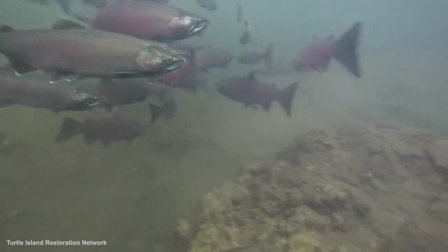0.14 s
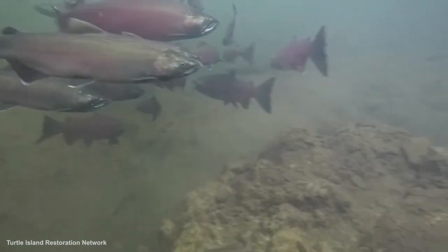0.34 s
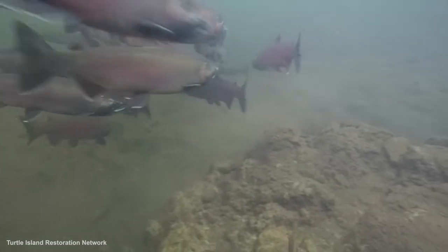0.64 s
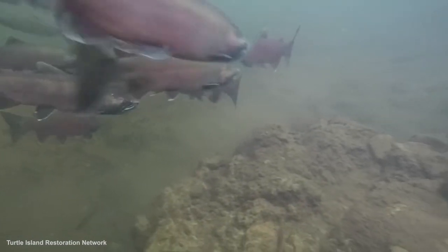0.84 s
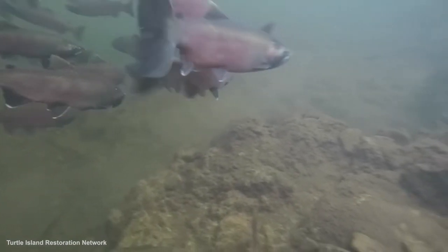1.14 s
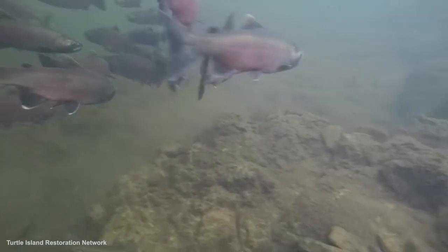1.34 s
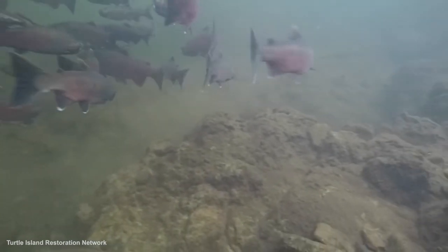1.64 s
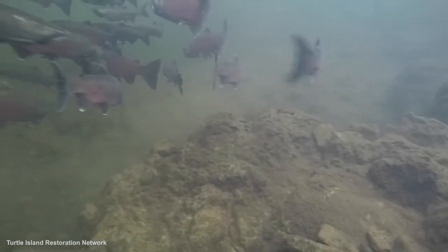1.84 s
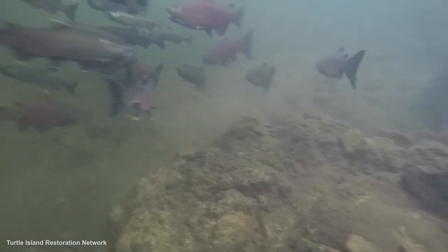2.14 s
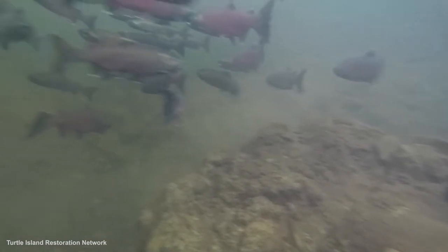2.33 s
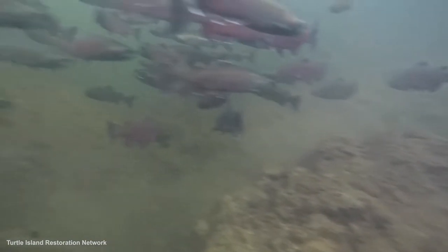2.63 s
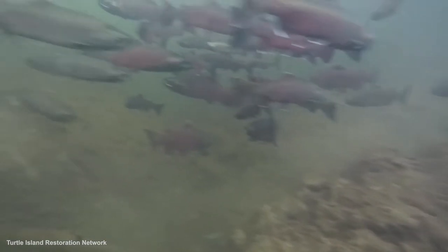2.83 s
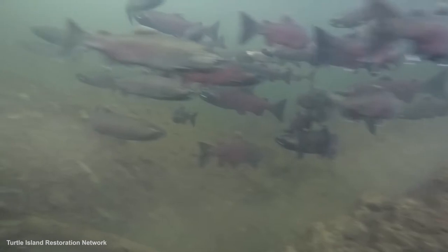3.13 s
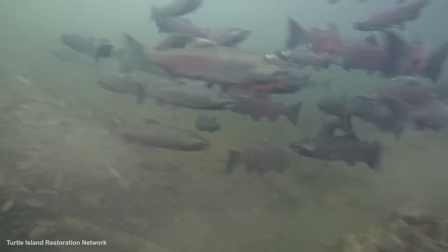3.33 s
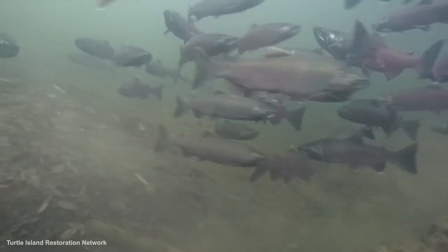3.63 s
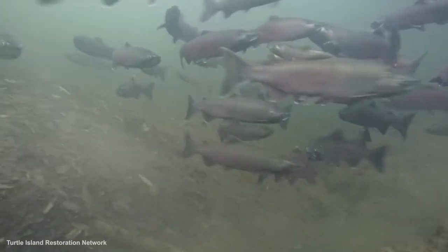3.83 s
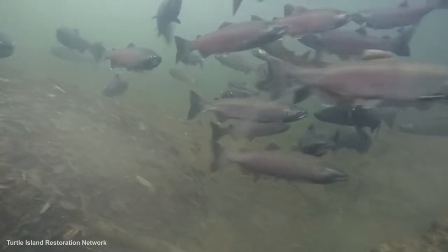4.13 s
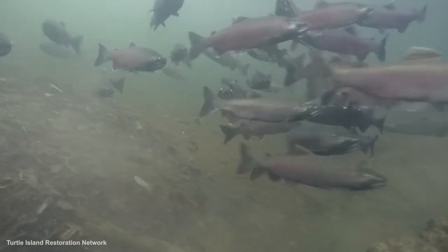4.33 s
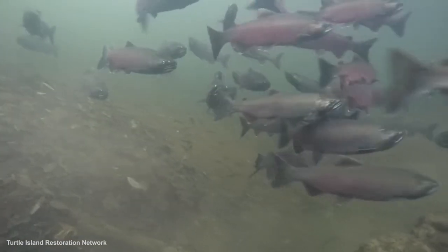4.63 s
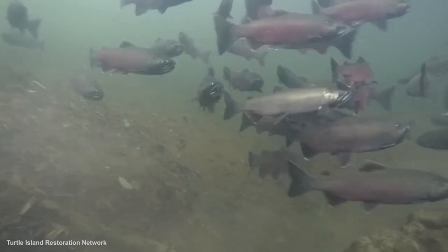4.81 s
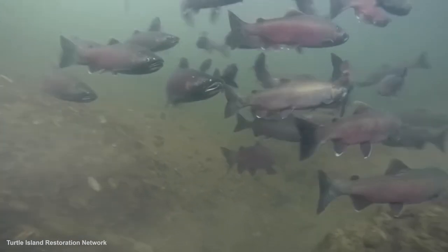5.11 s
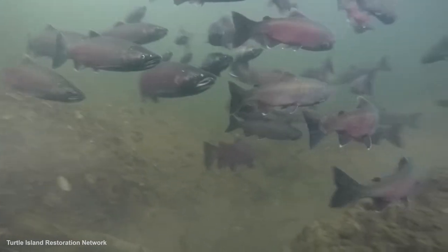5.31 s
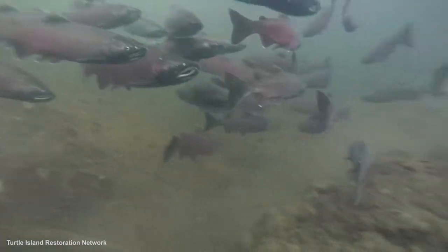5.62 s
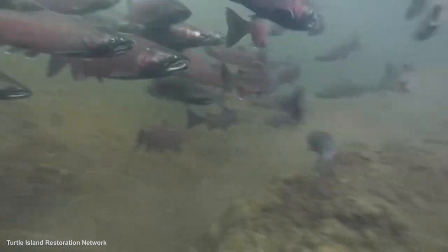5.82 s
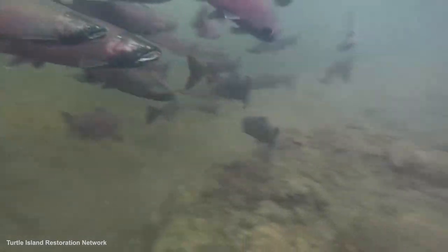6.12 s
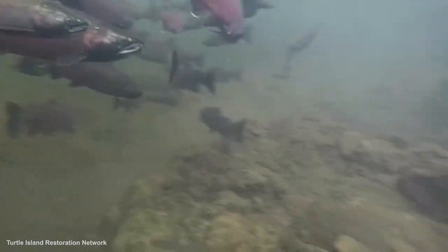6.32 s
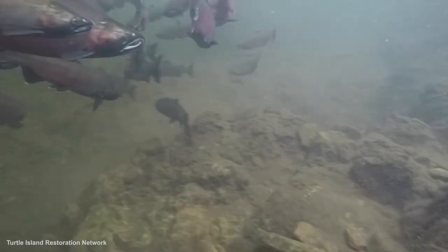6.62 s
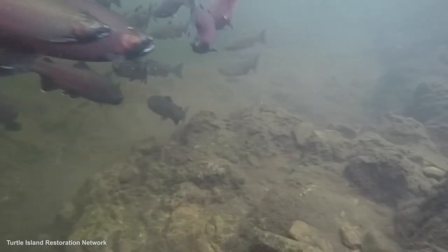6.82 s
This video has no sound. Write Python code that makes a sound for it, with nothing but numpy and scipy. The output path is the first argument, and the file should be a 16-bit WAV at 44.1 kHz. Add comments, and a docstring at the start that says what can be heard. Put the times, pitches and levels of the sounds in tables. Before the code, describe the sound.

Deep muffled thuds of shifting current subside into a quiet underwater riffle, dotted with bubble blips, thin silt hiss and small clicks.

```python
"""First come low, heavy surges and shoves of current against a sealed housing, under water in a salmon creek.
Behind them lies the distant riffle, a soft wash of countless small bubbles, with a thin hiss of silt.
Close to the microphone single bubbles gurgle, grit ticks on the case and knots of small bubbles trickle past.
Eddies, wash and hiss are shaped noise; bubbles are gliding, decaying sines; grains are short rings with noise."""
import sys
import numpy as np
from scipy import signal
from scipy.fft import rfft, irfft, next_fast_len
from scipy.io import wavfile
from scipy.ndimage import uniform_filter1d

SR = 44100
rng = np.random.default_rng(int(sys.argv[2]) if len(sys.argv) > 2 else 0)


def wav_record(signal):
    """Record a signal, one row per channel, as 16-bit PCM in the file named by sys.argv[1]."""
    frames = np.transpose(np.atleast_2d(signal))
    bounded = np.clip(frames, -1, 1)
    # unit amplitude maps onto the largest positive 16-bit level
    quanta = np.round(bounded * 32767).astype(np.int16)
    wavfile.write(sys.argv[1], SR, quanta)


N = 306936  # samples


def amp(db):
    """Decibels to gain."""
    return 10 ** (np.asarray(db) / 20)


def unit(x):
    """Scale to rms 1."""
    return x / np.sqrt(np.mean(x ** 2) + 1e-20)


def filtered(x, response):
    """Multiply the spectrum of x by a response of frequency, without phase shift."""
    padded = next_fast_len(len(x) + SR // 2)
    hz = np.fft.rfftfreq(padded, 1 / SR)
    return irfft(rfft(x, padded) * response(hz), padded)[:len(x)]


def lowpass(x, corner_hz, order):
    """Keep mainly what lies below the corner."""
    return filtered(x, lambda hz: 1 / (1 + (hz / corner_hz) ** order))


def coloured(x, spectrum):
    """Shape x with a (f/Hz, level/dB) spectrum, then scale to rms 1."""
    f, db = np.transpose(spectrum)
    return unit(filtered(x, lambda hz: amp(np.interp(np.log(hz + 1), np.log(f + 1), db))))


def t60_decay(t, t60):
    """Exponential decay that has fallen 60 dB after t60 seconds."""
    return np.exp(-np.log(1000) * t / t60)


def add(track, s, sound):
    """Mix a sound into the track at time s."""
    part = track[max(0, round(s * SR)):][:len(sound)]
    part += sound[:len(part)]


SKIRT = 11  # far from its crest a swell dies away as this power of time


def swells(rows):
    """Gain of (t/s, level/dB, width/s) swells, round at the crest, summed as powers."""
    t = np.arange(N) / SR
    power = np.zeros(N)
    for s, db, width in rows:
        swell = amp(db) * (1 + ((t - s) / width) ** 2 / SKIRT) ** (-SKIRT / 2)
        power += swell ** 2
    return np.sqrt(power)


def eddies(spectrum, span):
    """Low turbulent pressure whose strength is evened out over span seconds."""
    x = coloured(rng.standard_normal(N), spectrum)
    power = uniform_filter1d(np.abs(signal.hilbert(x)) ** 2, max(1, int(span * SR)))
    return unit(x / np.sqrt(np.abs(power) + 1e-3))


REBOUND = 0.4  # how far the swing after a shove outgrows the one before it


def shove(u):
    """Pressure of one eddy passing, u widths from its centre: a peak, then the water swings back."""
    return (1 - u ** 2 - REBOUND * u) * np.exp(-u ** 2 / 2)


# Relative spectra of the slow sway and the faster buffeting at the housing: f/Hz, level/dB
SWAY_SPECTRUM = [(2, 5.5), (6, 1), (12, 4.5), (19, -2), (28, -52.5), (45, -56), (90, -93), (200, -120)]
BUFFET_SPECTRUM = [(14, -8), (23, 12), (34, -8), (52, -13.5), (70, -20.5), (100, -31.5), (150, -48),
                   (400, -100)]
# Surges of current past the housing: crest t/s, buffeting level/dB before small eddies grow, width/s
CURRENT_SURGES = [(0.118, -44, 0.061), (0.3, -41, 0.11), (0.505, -32.5, 0.039), (0.74, -51.5, 0.14),
                  (0.96, -45.5, 0.11), (1.361, -50, 0.27), (1.75, -49.5, 0.12), (2.01, -47.5, 0.14),
                  (2.5, -54, 0.13), (2.889, -51.5, 0.11), (3.403, -55.5, 0.073), (4.0, -57.5, 0.086),
                  (4.37, -46.5, 0.12), (4.57, -47, 0.11), (5.101, -52, 0.15), (5.42, -56, 0.04),
                  (5.78, -55.5, 0.15), (6.22, -59, 0.13), (6.82, -54.5, 0.12)]
# Sudden shoves of water: t/s, level/dB before the last column, width/s, signed factor (push +, suction -)
WATER_SHOVES = [(0.008, -19, 0.022, -1.17), (0.043, -29.5, 0.009, -1.4), (0.126, -25, 0.015, 1),
                (0.182, -31.5, 0.0084, -1.24), (0.284, -26.5, 0.0093, 1), (0.403, -22.5, 0.016, -1.2),
                (0.505, -17, 0.011, -1.15), (0.581, -31, 0.01, -0.84), (0.639, -21, 0.008, -0.65),
                (0.841, -37.5, 0.0083, 0.91), (0.9, -29, 0.0089, 0.86), (0.957, -29.5, 0.0068, 0.79),
                (1.042, -23, 0.013, -1.1), (1.37, -30.5, 0.012, 0.79), (4.404, -28, 0.019, -0.88),
                (4.495, -30, 0.0093, 1), (4.545, -43, 0.006, -0.89), (4.571, -32, 0.0075, -1.1),
                (4.602, -28, 0.019, -0.93), (5.11, -30, 0.023, -1.07), (5.431, -34.5, 0.02, -1),
                (5.795, -28.5, 0.025, -1.06)]
CALM_DB, MIDDLING_DB = -81, -40.5  # buffeting between surges and in a middling one
SWAY_DB, SWAY_GROWS = -30, 0.75  # sway in a middling surge; its dB per dB of buffeting
SWAY_OUTLASTS = 1.29  # length of the sway over that of the buffeting
SMALL_EDDY_HZ, SMALL_EDDY_GROWS = 45.3, 0.39  # lower bound of small eddies; their extra dB per dB
SHOVE_EDGE = 0.23  # share of the hardest shove in its steep core; gentler ones are rounder
EDGE_WIDTH = 0.47  # width of that core over the whole shove


def current():
    """Surges sway and buffet the housing, brighter the stronger they are; single eddies shove it."""
    sway_rows = []
    for s, db, width in CURRENT_SURGES:
        sway_db = SWAY_DB + SWAY_GROWS * (db - MIDDLING_DB)
        sway_rows.append((s, sway_db, SWAY_OUTLASTS * width))
    sway = lowpass(swells(sway_rows) * eddies(SWAY_SPECTRUM, span=0.19), corner_hz=30.2, order=4)

    strength = np.hypot(swells(CURRENT_SURGES), amp(CALM_DB))
    churn = eddies(BUFFET_SPECTRUM, span=0.086)
    large = lowpass(churn, corner_hz=SMALL_EDDY_HZ, order=6)
    small = (churn - large) * (strength / amp(MIDDLING_DB)) ** SMALL_EDDY_GROWS
    pressure = strength * (large + small)

    hardest_db = max(row[1] for row in WATER_SHOVES)
    for s, db, width, direction in WATER_SHOVES:
        u = (np.arange(N) / SR - s) / width
        edge = SHOVE_EDGE * amp(db - hardest_db)
        shape = (1 - edge) * shove(u) + edge * shove(u / EDGE_WIDTH)
        pressure += direction * amp(db) * shape
    return lowpass(sway + pressure, corner_hz=122, order=8)


def patchy_noise(patchy_db):
    """White noise with short patches of random gain across time and pitch."""
    z = signal.stft(rng.standard_normal(N), nperseg=1024)[2]
    field = uniform_filter1d(rng.standard_normal(z.shape), size=6, axis=0)
    field = uniform_filter1d(field, size=7, axis=1)
    return unit(signal.istft(z * amp(patchy_db * unit(field)), nperseg=1024)[1][:N])


def bubble(t, hz, t60, rise, onset_cycles):
    """A bubble rings softly into life and its pitch glides by the share rise over t60; peak of swell 1."""
    phase = 2 * np.pi * hz * t * (1 + rise * t / t60 / 2)
    swell = t60_decay(t, t60) * (1 - np.exp(-t * hz / onset_cycles))
    return np.sin(phase) * swell / swell.max(axis=-1, keepdims=True)


def bubble_cloud(count, low_hz, high_hz, cycles, spread_db):
    """Small bubbles at random moments, rms 1; a positive spread lifts a few, a negative one sinks a few."""
    when, size, life, strength = rng.random((count, 4)).T[:, :, None]
    hz = low_hz * (high_hz / low_hz) ** size
    t = np.arange(SR // 16) / SR
    gain = amp(spread_db * np.minimum(-np.log(1 - strength), 4)) * hz / low_hz
    rings = gain * bubble(t, hz, cycles * (.5 + life) / hz, rise=0.13, onset_cycles=0.66)
    at = (when * N).astype(int) + np.arange(len(t))
    return unit(np.bincount(at.ravel(), rings.ravel(), N)[:N])


# Relative spectra of the distant wash and the hollow rush below it: f/Hz, level/dB
WASH_SPECTRUM = [(110, -12), (175, -4), (260, -3.5), (350, 1.5), (420, -3), (475, 0), (540, -3.5), (780, 3),
                 (1100, -1.5), (1350, 0.46), (1950, -1.5), (2450, -4.5), (3200, -7), (4500, -12),
                 (5800, -16.5), (7000, -16.5), (12000, -73)]
HOLLOW_SPECTRUM = [(30, 2), (70, -0.5), (110, -0.5), (160, -13.5), (260, -32), (600, -77)]
RIFFLE_DB, HOLLOW_DB = -65, -78  # steady levels


def riffle():
    """Far bubbles merge into a wash; nearer ones babble through it, over a faint hollow rush."""
    babble = bubble_cloud(count=450, low_hz=284.3, high_hz=1008, cycles=58, spread_db=1.5)
    prickle = bubble_cloud(count=2200, low_hz=1123, high_hz=5850, cycles=14.5, spread_db=3.0)
    mixture = patchy_noise(patchy_db=1.5) + amp(-24.0) * babble + amp(-12.0) * prickle
    wash = coloured(mixture, WASH_SPECTRUM)
    flutter_noise = coloured(rng.standard_normal(N), [(2, 8.0), (25, -24.0), (80, -27), (300, -100)])
    flutter = 1 + 0.045 * flutter_noise
    hollow = coloured(rng.standard_normal(N), HOLLOW_SPECTRUM)
    return amp(RIFFLE_DB) * flutter * wash + amp(HOLLOW_DB) * hollow


# Relative spectrum of the silt hiss: f/Hz, level/dB
SILT_SPECTRUM = [(3500, -3), (6000, -20.5), (7500, -1.5), (10800, -4), (13000, -12), (15500, -17.5)]
SILT_DB = -77.5  # steady level


def silt():
    """Fine sand and tiny bubbles sweep past as a thin hiss dotted with faint pings."""
    pings = bubble_cloud(count=700, low_hz=6160, high_hz=12700, cycles=14, spread_db=3.0)
    return amp(SILT_DB) * coloured(patchy_noise(patchy_db=2.0) + amp(-12.5) * pings, SILT_SPECTRUM)


# Single bubbles close to the microphone: t/s, ring level/dB, starting f/Hz,
# share of pitch gained (+) or lost (-) by the time it is 60 dB down, starting-pitch cycles until then
NEAR_BUBBLES = [(0.3028, -49.5, 3000, 0.0042, 31), (0.304, -62.5, 560, 0.12, 49),
                (0.388, -56, 3900, 0.36, 17), (0.396, -69, 716, 0.42, 45), (0.491, -65, 395, -0.43, 60),
                (0.578, -61.5, 730, 0.58, 61), (0.738, -63.5, 376, 0.22, 41), (0.872, -59, 1165, 0.32, 43),
                (1.078, -59, 840, 0.24, 63), (1.242, -61, 646, 0.46, 49), (1.407, -61.5, 680, 0.42, 52),
                (1.529, -56, 4050, -0.046, 25), (1.609, -57, 4450, 0.12, 30), (2.44, -62, 765, -0.013, 38),
                (2.678, -57.5, 437, -0.37, 35), (3.092, -59, 810, -0.07, 49), (3.112, -59, 707, -0.051, 55),
                (3.18, -57, 3170, 0.95, 42), (3.182, -53.5, 1600, 1.8, 40), (3.191, -61, 2750, 0.4, 40),
                (3.24, -61, 3150, 0.3, 35), (3.277, -58, 3260, -0.039, 35), (3.968, -64, 317, 0.41, 30),
                (4.362, -56, 2600, 0.039, 26), (4.49, -64.5, 486, 0.15, 45),
                (4.937, -53.5, 3030, -0.04, 26), (4.944, -49, 3830, -0.055, 26),
                (4.992, -54.5, 2100, 0.15, 30), (5.045, -63, 488, 0.08, 56), (5.133, -60, 302, 0.78, 31),
                (5.16, -58.5, 830, 0.021, 49), (5.161, -61, 364, 0.23, 36), (5.205, -63, 463, -0.0036, 27),
                (5.297, -62, 585, 0.13, 84), (5.738, -64, 400, -0.15, 48), (6.554, -58, 1870, 0.17, 43),
                (6.593, -61.5, 415, 0.6, 55), (6.591, -61, 926, 0.37, 40), (6.6225, -54, 525, 0.65, 34),
                (6.6268, -54.5, 2170, -0.19, 20), (6.626, -58.5, 1220, 0.08, 35),
                (6.633, -62, 2100, 0.17, 22), (6.636, -59.5, 1500, 0.017, 30), (6.637, -61, 690, 0.34, 44),
                (6.645, -63, 518, 0.37, 64), (6.674, -62, 1700, 0.1, 28), (6.691, -60, 800, 0.84, 35),
                (6.708, -61, 634, 0.36, 46), (6.717, -59.5, 820, 0.1, 41), (6.775, -58, 1115, 0.27, 30),
                (6.842, -59.5, 1830, 0.27, 84)]
STRAY_BUBBLE_DB = -80.5  # rms of fainter bubbles at random moments
SNAP_DB, SNAP_HZ = -5, 3500  # snap against the ring, for a bubble of this pitch
SNAP_GROWS = 0.6  # the snap grows as this power of pitch
SNAP_CYCLES = 9  # cycles of the bubble until the snap is 60 dB down


def gurgles():
    """Bubbles close by snap free and ring: the lower the pitch, the softer the snap; some chirp upward."""
    track, t = np.zeros(N), np.arange(SR // 4) / SR
    for s, db, hz, rise, cycles in NEAR_BUBBLES:
        snap = coloured(rng.standard_normal(len(t)), [(hz / 3, -20), (hz, 0), (hz * 1.6, -5), (hz * 4, -28)])
        snap *= amp(SNAP_DB) * (hz / SNAP_HZ) ** SNAP_GROWS
        snap *= t60_decay(t, SNAP_CYCLES / hz)
        ring = bubble(t, hz, cycles / hz, rise, onset_cycles=1.0)
        add(track, s, amp(db) * (ring + snap))
    stray = bubble_cloud(count=30, low_hz=331.4, high_hz=868, cycles=42, spread_db=-1.5)
    return track + amp(STRAY_BUBBLE_DB) * stray


def stray_grit(count):
    """Rows (t/s, peak level/dB, ring f/Hz) of faint grains carried by the stream."""
    when, strength, size = rng.random((count, 3)).T
    low_hz, high_hz = 5000, 12400
    db = -67.5 + 5 * (2 * strength - 1)  # 5 dB either way
    return list(zip(when * N / SR, db, low_hz * (high_hz / low_hz) ** size))


# Grains striking the case: t/s, peak level/dB, ring f/Hz
GRIT_TICKS = [(0.477, -62, 7800), (0.6272, -54, 11300), (1.407, -67, 6100), (1.636, -58, 6900),
              (2.259, -55, 9600), (2.4395, -59, 5900), (2.509, -60, 12100), (3.116, -47, 8900),
              (3.274, -52.5, 9900), (3.2857, -53, 9100), (4.084, -58, 8100), (4.927, -58, 8600),
              (5.0284, -53, 10700), (5.2045, -57, 5270), (5.2065, -57, 7900), (5.2903, -53, 8850),
              (5.2998, -41, 8400), (6.286, -61, 10000), (6.549, -56, 8200), (6.623, -53.5, 4130)]
TICK_HZ, TICK_T60_S = 9000, 0.0012  # a grain of this pitch rings this long
TICK_SHORTENS = 1.3  # ring time falls as this power of pitch


def grit():
    """Each grain on the case gives a dry, briefly ringing tick with a fainter, longer skitter."""
    track, t = np.zeros(N), np.arange(SR // 64) / SR
    for s, db, hz in list(GRIT_TICKS) + stray_grit(count=170):
        fade = t60_decay(t, TICK_T60_S * (TICK_HZ / hz) ** TICK_SHORTENS)
        ring = np.sin(2 * np.pi * hz * t) * fade
        skitter = coloured(rng.standard_normal(len(t)), [(hz / 4, -25), (hz, 0), (hz * 2.05, -12), (hz * 3, -45)])
        contact = 1 - np.exp(-t * hz)  # a lower-pitched, bigger grain lands more softly
        tick = contact * (ring + amp(-11) * skitter * fade ** 0.17)
        add(track, s, amp(db) * tick / np.abs(tick).max())
    return track


# Knots of small bubbles passing the microphone: crest t/s, level/dB, width/s
BUBBLE_FLURRIES = [(3.24, -71.5, 0.13), (4.96, -69, 0.023), (6.634, -66, 0.008), (6.71, -80, 0.051)]


def flurries():
    """Now and then a knot of small, quickly damped bubbles trickles past."""
    trickle = bubble_cloud(count=2400, low_hz=660, high_hz=2400, cycles=5.2, spread_db=-5.0)
    return swells(BUBBLE_FLURRIES) * trickle


def scene():
    """Everything reaches the one sealed microphone."""
    return (current() + riffle() + silt() + gurgles() + grit() + flurries())[None]


def record(dry):
    """The camera in the housing keeps nothing above its band limit: a steep low-pass, run both ways."""
    stop_hz = 16150
    band_limit = signal.cheby2(16, 60, stop_hz, fs=SR, output="sos")
    return signal.sosfiltfilt(band_limit, dry)


dry = scene()
out = record(dry)
wav_record(out)
```